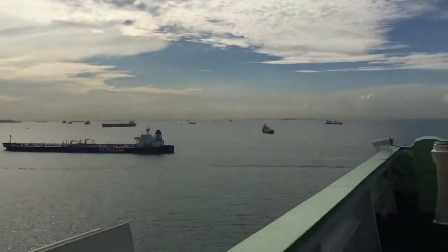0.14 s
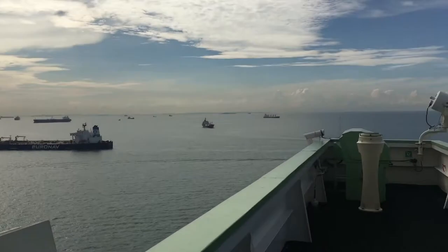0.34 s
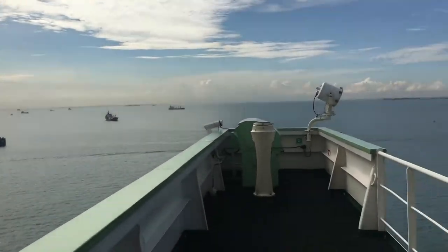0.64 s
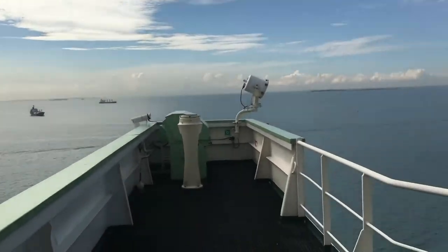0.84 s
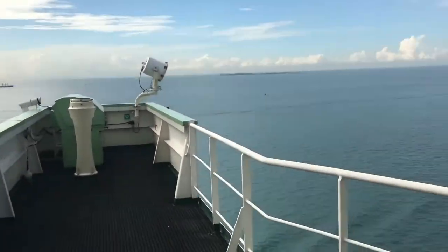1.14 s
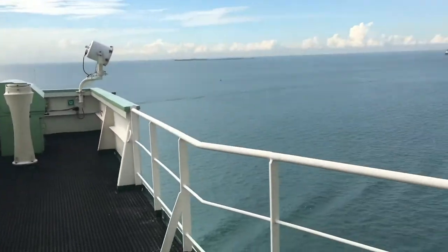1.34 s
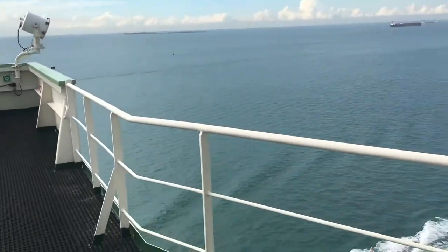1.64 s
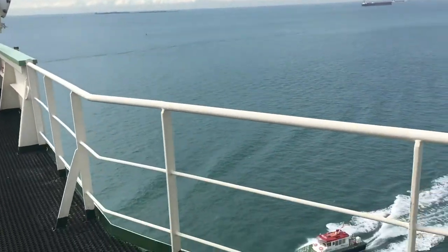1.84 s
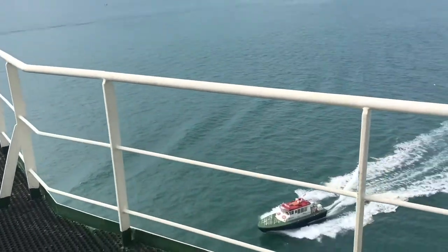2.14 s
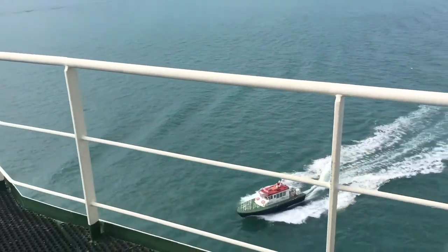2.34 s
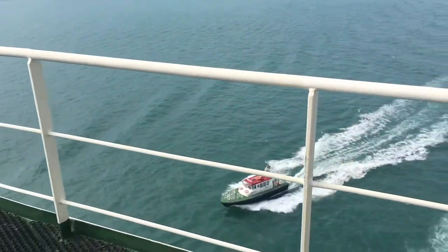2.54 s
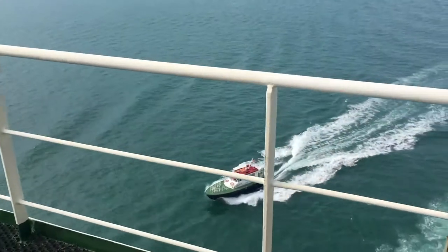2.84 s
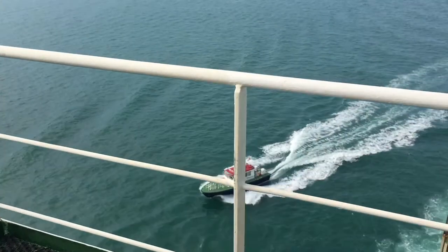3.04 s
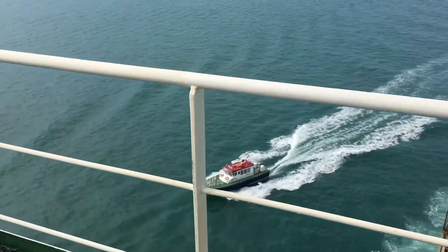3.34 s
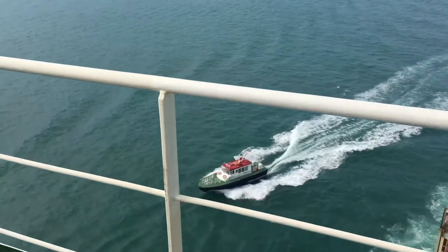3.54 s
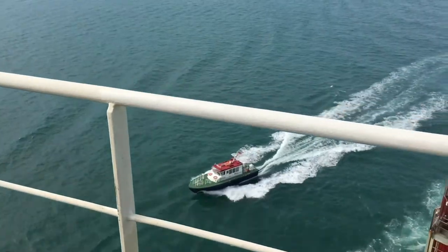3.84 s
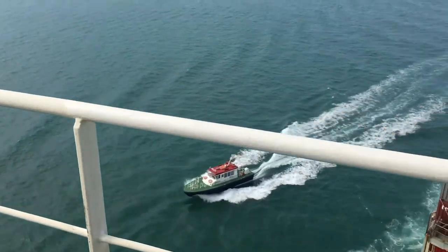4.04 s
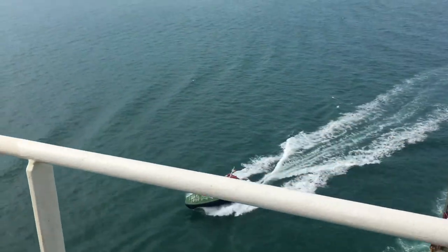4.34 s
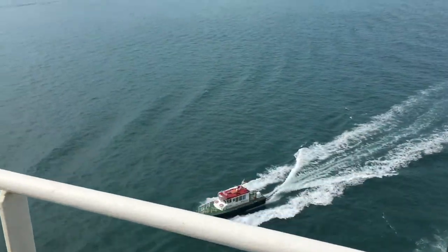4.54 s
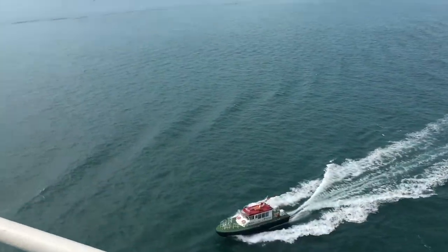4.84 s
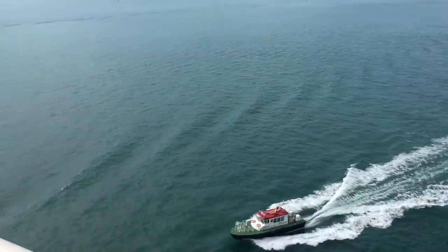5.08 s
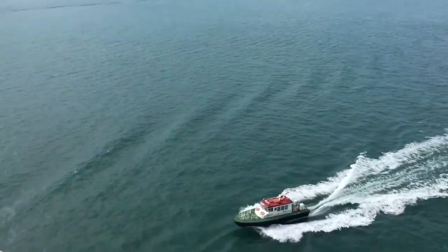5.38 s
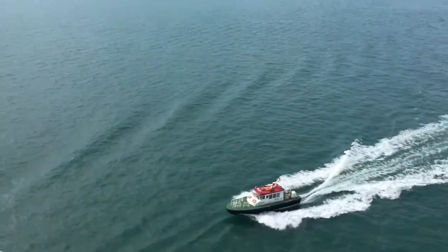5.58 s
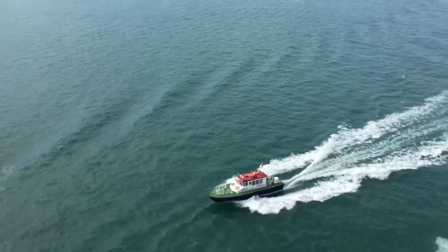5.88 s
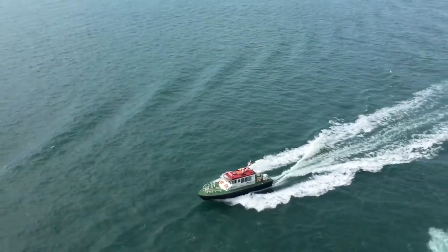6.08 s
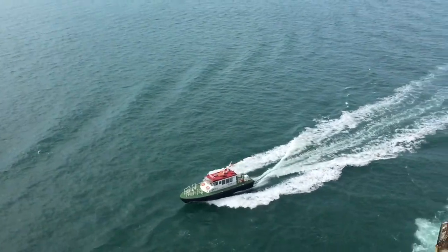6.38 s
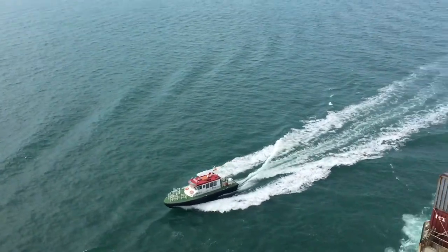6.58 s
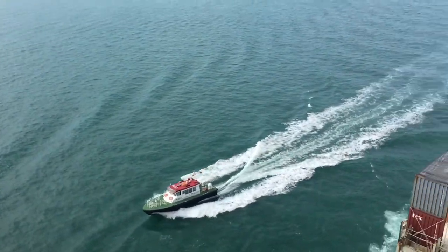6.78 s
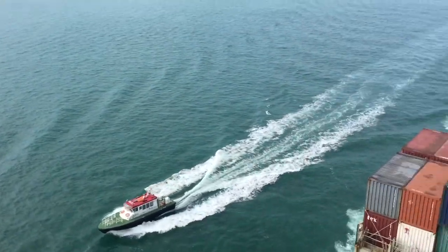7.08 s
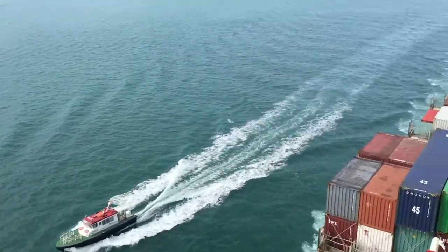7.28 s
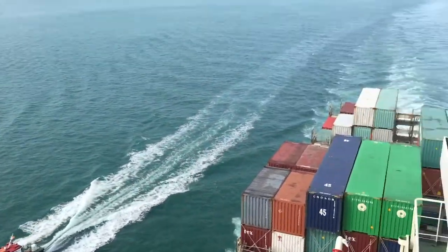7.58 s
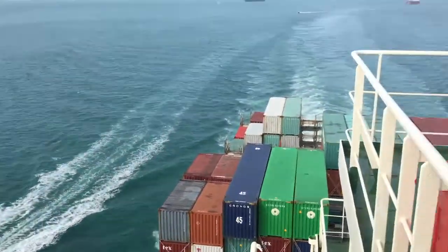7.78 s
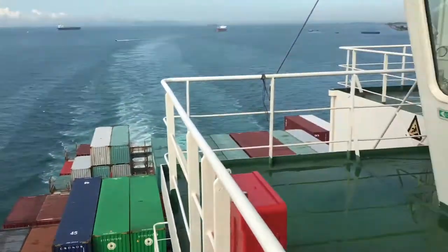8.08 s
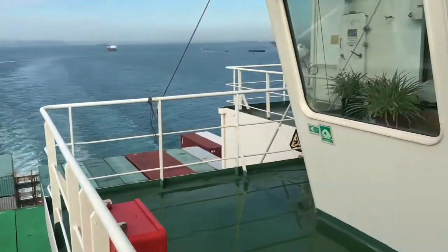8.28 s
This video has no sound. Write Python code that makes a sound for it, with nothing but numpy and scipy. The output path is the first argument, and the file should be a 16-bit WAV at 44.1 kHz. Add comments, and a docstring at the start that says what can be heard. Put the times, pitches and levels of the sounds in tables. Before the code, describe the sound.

Deep pulsing engine drone on a container ship's open bridge deck, with rumbling wind, gusty hiss and a faint sinking whine.

```python
"""A ship's diesel exhaust throbs in close low tones, heard from a microphone carried along the bridge rail.
The tones are sines tied to the engine cycle, and some swell and fade from spot to spot.
Ventilation roars as coloured noise and a faint whine of hoarse sines runs down; a nearing steel wall
combs both with an echo and adds a hollow drone. Wind noise buffets the microphone and hisses in gusts.
A thin whistle, a fluttering sine, comes and goes."""
import sys
import numpy as np
from scipy import signal
from scipy.fft import rfft, irfft
from scipy.io import wavfile
from scipy.ndimage import map_coordinates

SR = 44100
rng = np.random.default_rng(int(sys.argv[2]) if len(sys.argv) > 2 else 0)


def wav_record(signal):
    """Record a signal, one row per channel, as 16-bit PCM in the file named by sys.argv[1]."""
    frames = np.transpose(np.atleast_2d(signal))
    bounded = np.clip(frames, -1, 1)
    # unit amplitude maps onto the largest positive 16-bit level
    quanta = np.round(bounded * 32767).astype(np.int16)
    wavfile.write(sys.argv[1], SR, quanta)


N = 371322
TIME = np.arange(N) / SR  # seconds
FREQ = np.maximum(np.arange(N // 2 + 1) * SR / N, 1)  # Hz

# Colour of the ventilation and the wash along the hull.
# Each row: frequency in Hz, relative level in dB per Hz.
ROAR_COLOUR = [(120, -11), (290, 2), (380, -1), (425, 1), (455, -2), (640, -1), (1050, -4.5), (1650, -8.5),
               (2020, -10), (2170, -8), (2300, -12), (2800, -21), (10000, -38), (17000, -57.5)]
# Surges of the roar; negative ones are lulls.
# Each row: peak time in seconds, half width in seconds, change in dB.
ROAR_SURGES = [(.1, 0.44, -2.5), (1.15, .2, -1.2), (1.65, .13, 0.9), (2.08, 0.16, -1.7), (2.60, 0.25, 1.5),
               (5.75, 0.43, 1.3), (7.49, .09, 3)]
ROAR_LEVEL_DB = -46  # between surges, before the wall's echo

# Reflection from a steel wall that comes nearer.
# Each row: time in seconds, echo delay in ms, basic echo strength (0 to 1, scaled for each source).
WALL = [(0, 9.15, .3), (1.05, 9.14, .27), (2.3, 8.32, .42), (3.3, 7.93, .28), (5, 7.8, .2),
        (6.3, 7.12, .19), (8.42, 6.8, .14)]
WHINE_ECHO = 1.8  # times the basic echo strength

# The drone's swell: peak time in seconds, half width in seconds, change in dB.
DRONE_SWELL = (2.55, .45, 5.9)
DRONE_START_DB, DRONE_FADE_DB_PER_S = -56.5, .5

# The whine's swell when passing the rotor: peak time in seconds, half width in seconds, change in dB.
WHINE_SWELL = (2.37, 0.62, 3.4)
WHINE_START_DB, WHINE_FADE_DB_PER_S = -60.3, .57  # second partial, before swell and echo
ROTOR_START_HZ, ROTOR_SLOWING_PER_S = 885, .049  # first partial, and the share of speed lost per second

# Flares of the whistle, added to its idle sound.
# Each row: start in seconds, length in seconds, level in dB.
WHISTLE_FLARES = [(.31, .26, -69.5), (.72, .62, -78), (1.87, .08, -77), (2.22, 0.26, -64.5),
                  (4.42, .2, -79), (4.80, .36, -77), (5.22, .3, -79)]
WHISTLE_IDLE_DB, WHISTLE_EDGE_S = -86.5, .04  # level between flares; length of each rise and fall
WHISTLE_START_HZ, WHISTLE_SAG_HZ_PER_S = 7874, 17

# Colour of the wind pressure on the microphone.
# Each row: frequency in Hz, relative level in dB per Hz.
BUFFET_COLOUR = [(12, -13.5), (23, -10), (32, -4.5), (50, 0), (85, -4.5), (120, -4.5), (150, -10.5),
                 (200, -10), (260, -15.5), (400, -26), (800, -51)]
# Strength of the buffeting, before a fixed boost.
# Each row: time in seconds, level in dB.
BUFFET_STRENGTH = [(0, -38), (.4, -40), (1.0, -37), (2.7, -36), (3.6, -39), (4.3, -37), (5.6, -34),
                   (8.42, -34.5)]
BUFFET_BOOST_DB = 3
# Colour of the air rushing past the rail and the microphone.
# Each row: frequency in Hz, relative level in dB per Hz.
HISS_COLOUR = [(800, -8.5), (2000, -2.5), (3300, 2.5), (4400, 0), (5800, -1.5), (7400, -6), (9300, -8),
               (11500, -13.5), (17000, -25)]
# Steady breeze, picking up as the microphone leaves the lee of the bulwark; before a fixed boost.
# Each row: time in seconds, hiss level in dB.
BREEZE = [(0, -65.5), (.25, -66), (.75, -59.5), (1.55, -61), (2.5, -58.5), (5.8, -57), (8.42, -55.5)]
HISS_BOOST_DB = 1.82
# Gusts on top of the breeze; negative ones are lulls.
# Each row: peak time in seconds, half width in seconds, change in dB.
GUSTS = [(.37, .03, 2), (1.09, 0.16, 3.5), (2.62, .04, 2), (2.80, .06, 0.5), (3.33, .16, 1),
         (3.63, .09, -1), (3.93, .11, 1.4), (4.25, .2, -.8), (5.48, 0.19, 1.6), (6.50, 0.18, 3),
         (7.02, .22, -1.2), (7.45, .14, 2), (7.75, .08, 1.5)]
GUST_BRIGHTNESS = .35  # extra treble dB per dB of gust

# Exhaust tones.
# Each row: multiple of the engine cycle rate, rms level in dB.
EXHAUST_TONES = [(6, -34.6), (7, -29.3), (8, -26.1), (9, -45.9), (10, -40.3), (11, -40.7), (12, -28.5),
                 (13, -37.8), (14, -38.7), (15, -22.6), (16, -36.3), (17, -37.9), (18, -38.8), (19, -36.8),
                 (20, -33.5), (21, -38.5), (22, -45.3), (23, -49.4), (24, -43.4), (25, -47.7), (26, -51.5),
                 (27, -51.0), (28, -51.2), (29, -50.5), (30, -50.4), (31, -52.0), (32, -44.5), (33, -51.1),
                 (34, -57.5), (35, -54.6), (36, -52.8), (40, -53.6), (41, -59.6)]
# Loud and dead spots of the steady tones' standing waves, passed on the way.
# Each row: multiple of the cycle rate, peak time in seconds, half width in seconds, change in dB.
STANDING_SPOTS = [(7, 0.93, 2.0, 5), (7, 4.1, 0.99, -3), (8, 3.46, 1.1, -4.5), (12, .5, 1.2, -11),
                  (15, 1.6, 1.3, -2.3), (15, 3.67, 0.85, 2), (19, 1.2, 1.5, 6.5), (19, 4.9, 0.64, -1.5),
                  (20, 2.4, 1.72, 15), (24, 3.8, 0.66, -12), (32, 3.9, 0.53, -10.5), (32, 7.0, 1.8, 6.5)]
CYCLE_HZ = 5.99  # four-stroke engine cycles per second
PUFFS_PER_CYCLE = 3

# Notches of the microphone port.
# Each row: frequency in Hz, width in Hz, depth in dB (negative).
PORT_NOTCHES = [(4910, 380, -4.5), (10370, 770, -5.5)]
TOP_HZ = 15700


def undb(db):
    """Turn decibels into gain."""
    return 10 ** (np.asarray(db) / 20)


def unit(x):
    """Scale to rms 1."""
    return x / np.std(x)


def curve(rows, axis=1):
    """Draw one column of a time table as a line through every sample."""
    rows = np.asarray(rows)
    return np.interp(TIME, rows[:, 0], rows[:, axis])


def swell(when, half_width, db):
    """A smooth bump in dB; one half width from its peak, 37 % of it is left."""
    return db * np.exp(-((TIME - when) / half_width) ** 2)


def walk(rate):
    """A smooth random curve of spread about 1, with about rate new values a second."""
    knots = rng.standard_normal(int(rate * N / SR) + 4)
    fine = signal.resample(knots, 16 * len(knots))
    knot_position = np.arange(len(fine)) * len(knots) / len(fine)
    return np.interp(TIME * rate, knot_position, fine)


def turbulence(colour, flicker_db, flicker_rate, count=10):
    """Coloured noise of rms 1 whose octave bands each flicker by themselves, as in turbulent air."""
    hz, db = np.transpose(colour)
    colour_db = np.interp(np.log(FREQ), np.log(hz), db, right=-100)
    spectrum = rfft(rng.standard_normal(N)) * undb(colour_db)
    octave = np.clip(np.log2(FREQ / 30), 0, count - 1)
    out = 0
    for k in range(count):
        # neighbouring bands cross-fade into each other
        band = irfft(spectrum * np.maximum(1 - abs(octave - k), 0), N)
        out = out + band * undb(flicker_db * walk(flicker_rate))
    return unit(out)


def tone(hz, rough, rough_rate, start=0):
    """A sine of rms about 1 that turbulent air shakes in level and phase; start is in turns."""
    phase = 2 * np.pi * (np.cumsum(hz * np.ones(N)) / SR + start)
    level_shaken = np.sin(phase) * (1 + rough * walk(rough_rate))
    sideways = np.cos(phase) * rough * walk(rough_rate)
    return (level_shaken + sideways) / np.sqrt(.5 + rough ** 2)


def ventilation():
    """The broad roar of fans and water is coloured noise, surging now and then."""
    surge_db = sum(swell(*surge) for surge in ROAR_SURGES)
    roar = turbulence(ROAR_COLOUR, flicker_db=.95, flicker_rate=9)
    return roar * undb(ROAR_LEVEL_DB + surge_db)


def drone():
    """A hollow resonance before the wall: three waves fit into the echo delay, so it rises as the wall nears."""
    hz = 3 * 1000 / curve(WALL)
    level_db = DRONE_START_DB - DRONE_FADE_DB_PER_S * TIME + swell(*DRONE_SWELL)
    return undb(level_db) * tone(hz, rough=4.4, rough_rate=70)


def whine():
    """A coasting rotor sinks in pitch, hoarse and strongest on its second partial."""
    hz = ROTOR_START_HZ * np.exp(-ROTOR_SLOWING_PER_S * TIME)
    first = undb(-9) * tone(hz, rough=1.8, rough_rate=72)
    second = tone(2 * hz, rough=2.4, rough_rate=70)
    # a weaker tone just under the second partial
    side = undb(-6) * tone(1.89 * hz, rough=1.8, rough_rate=45)
    third = undb(-9) * tone(2.97 * hz, rough=.9, rough_rate=50)
    level_db = WHINE_START_DB - WHINE_FADE_DB_PER_S * TIME + swell(*WHINE_SWELL)
    return undb(level_db) * (first + second + side + third)


def wall_echo(x, strength):
    """One reflection combs the sound; the comb's teeth glide up as the wall comes nearer."""
    delay_samples = curve(WALL) * SR / 1000
    late = map_coordinates(x, [np.arange(N) - delay_samples], order=3, mode="mirror")
    return x + strength * curve(WALL, axis=2) * late


def whistle():
    """A thin, fluttering high sine sags in pitch and flares up abruptly."""
    gain = undb(WHISTLE_IDLE_DB)
    for start, length, db in WHISTLE_FLARES:
        # time to the nearer end of the flare, negative outside it
        inside = np.minimum(TIME - start, start + length - TIME)
        gain = gain + undb(db) * np.clip(.5 + inside / WHISTLE_EDGE_S, 0, 1)
    flutter_db = 2 * walk(18)
    hz = WHISTLE_START_HZ - WHISTLE_SAG_HZ_PER_S * TIME
    return gain * undb(flutter_db) * tone(hz, rough=.45, rough_rate=100)


def wind():
    """Eddies thump on the microphone; gusts raise the hiss and brighten it."""
    buffet = turbulence(BUFFET_COLOUR, flicker_db=2, flicker_rate=16)
    buffet = buffet * undb(curve(BUFFET_STRENGTH) + BUFFET_BOOST_DB)
    # small restless changes ride on the gusts
    gust_db = sum(swell(*gust) for gust in GUSTS) + .43 * walk(12)
    hiss = turbulence(HISS_COLOUR, flicker_db=.4, flicker_rate=18)
    hiss = hiss * undb(curve(BREEZE) + gust_db + HISS_BOOST_DB)
    # the part above about 7500 Hz, 1 dB down when there is no gust
    treble = irfft(rfft(hiss) / (1 + (7500 / FREQ) ** 6), N)
    treble_db = GUST_BRIGHTNESS * gust_db - 1
    return buffet + hiss + treble * (undb(treble_db) - 1)


def undertones():
    """A second, slower engine puts weak tones halfway between the low exhaust tones."""
    out = 0
    for order in np.arange(7, 22) + .5:
        out = out + tone(order * CYCLE_HZ, rough=.41, rough_rate=1.113, start=rng.random())
    return undb(-42) * out


def standing_wave(order):
    """Gain (rms 1) of one exhaust tone as the microphone passes its loud and dead spots."""
    gain = undb(sum(swell(*spot) for k, *spot in STANDING_SPOTS if k == order))
    return gain / np.sqrt(np.mean(gain ** 2))


def exhaust():
    """A governed diesel puffs several times a cycle, so its tones throb together at that rate."""
    # the path from the funnel changes slowly, and with it the pattern of beats
    drift = [.06 * walk(.6) for _ in range(PUFFS_PER_CYCLE)]
    moment, turn = rng.random(2)
    steady_orders = [spot[0] for spot in STANDING_SPOTS]
    out = 0
    for order, db in EXHAUST_TONES:
        hz = order * CYCLE_HZ
        # a square-law phase shares the cycle's energy equally among the puffs
        start = order ** 2 / PUFFS_PER_CYCLE + order * moment + turn + drift[order % PUFFS_PER_CYCLE]
        if order in steady_orders:
            sound = standing_wave(order) * tone(hz, rough=.071, rough_rate=2.7, start=start)
        else:
            # the other tones arrive by many paths and slip in and out of step
            sound = tone(hz, rough=.8, rough_rate=.7, start=start)
        out = out + undb(db) * sound
    surge_db = .7 * walk(14)
    return out * undb(surge_db)


def scene():
    """All sounds add up in the open air; the wall mirrors the whine better than the diffuse roar."""
    roar_and_drone = wall_echo(ventilation() + drone(), 1)
    echoed_whine = wall_echo(whine(), WHINE_ECHO)
    mix = roar_and_drone + echoed_whine + whistle() + wind() + undertones() + exhaust()
    return mix[None]


def record(dry):
    """The sound fades in over 6 ms, the microphone's port notches the treble and a filter cuts the top."""
    out = dry * np.sin(np.pi / 2 * np.minimum(TIME / .006, 1)) ** 2
    for hz, width, db in PORT_NOTCHES:
        b, a = signal.iirpeak(hz, hz / width, fs=SR)
        # adding a negative share of the peak makes a notch
        out = out + (undb(db) - 1) * signal.lfilter(b, a, out)
    top_cut = signal.ellip(10, .1, 80, TOP_HZ, fs=SR, output="sos")
    return signal.sosfilt(top_cut, out)


dry = scene()
out = record(dry)
wav_record(out)
```